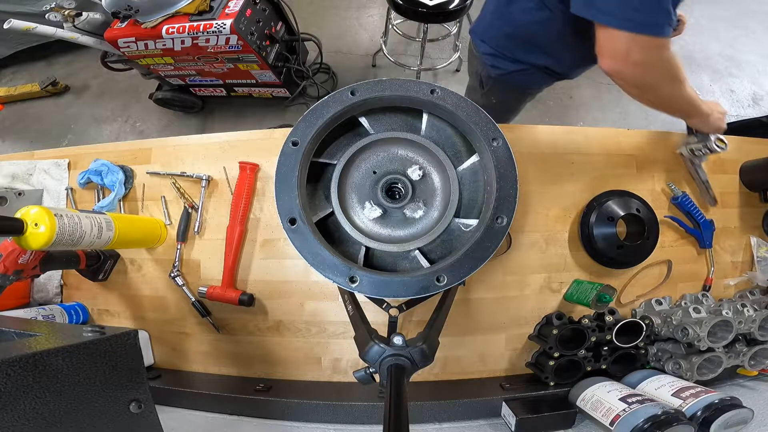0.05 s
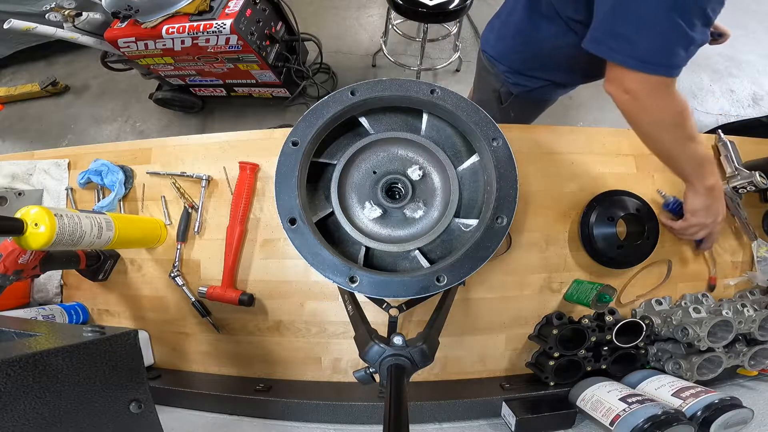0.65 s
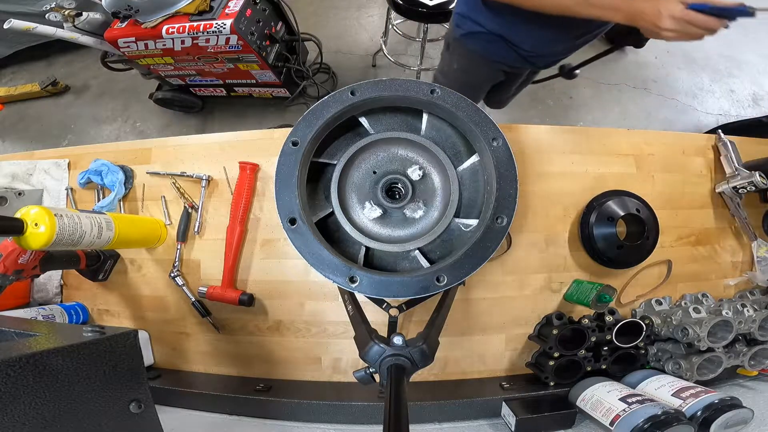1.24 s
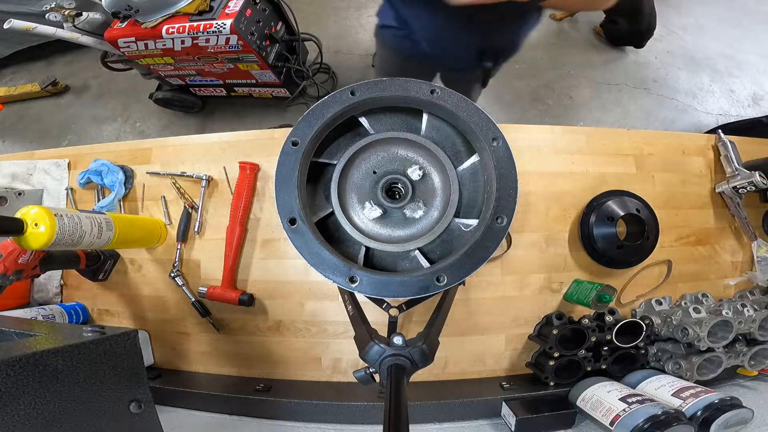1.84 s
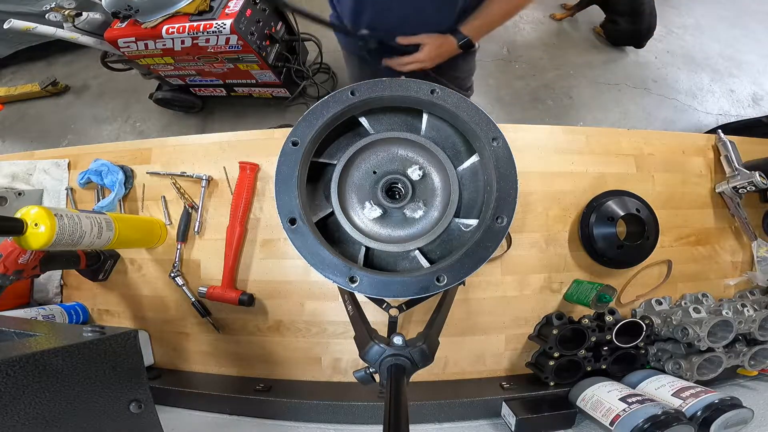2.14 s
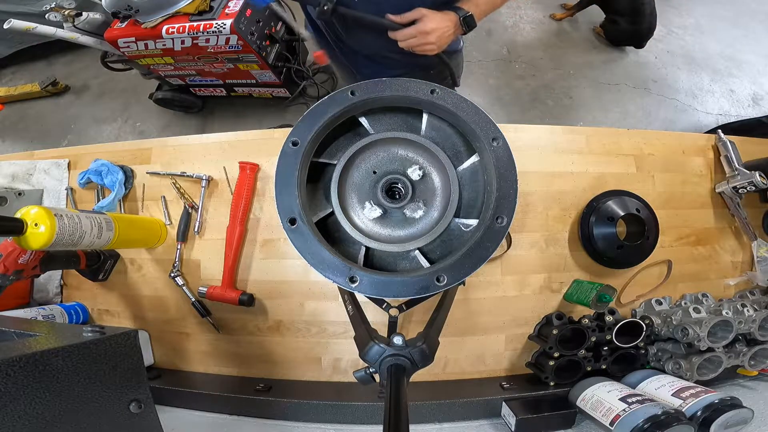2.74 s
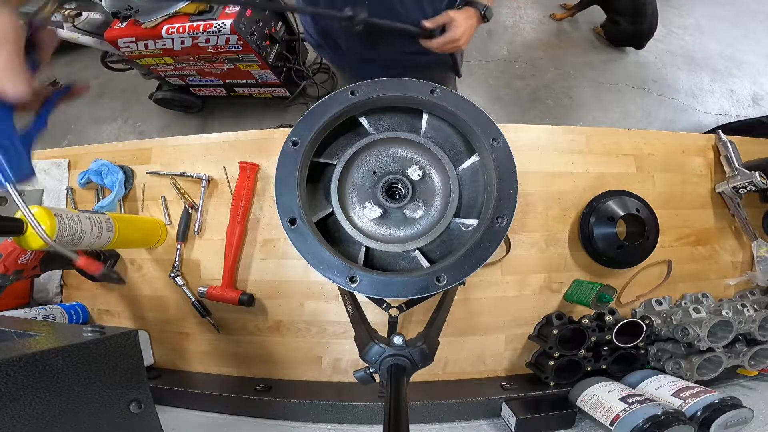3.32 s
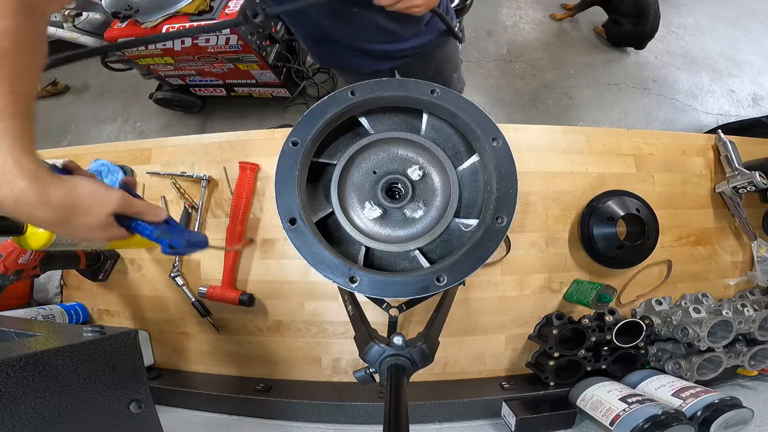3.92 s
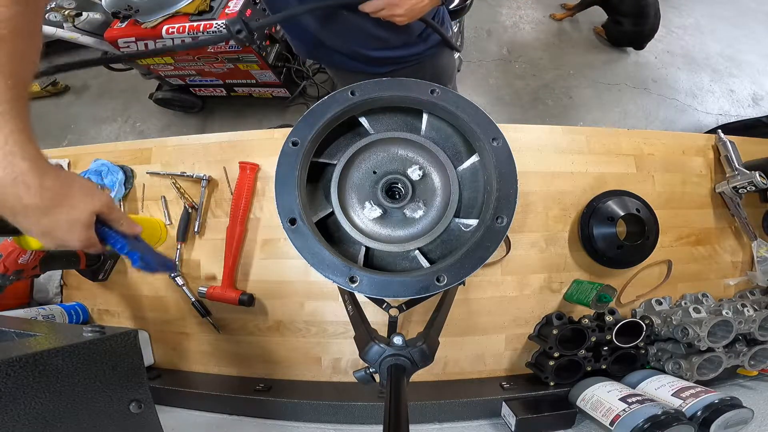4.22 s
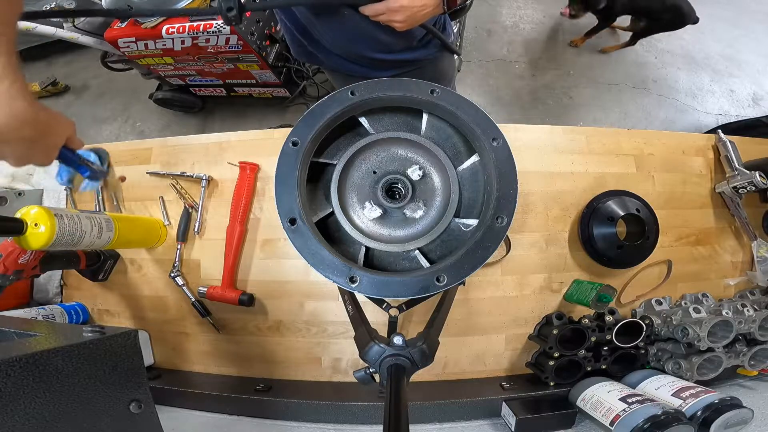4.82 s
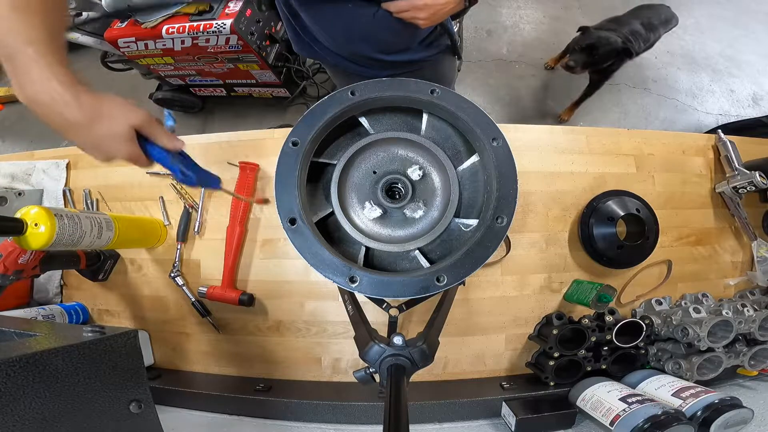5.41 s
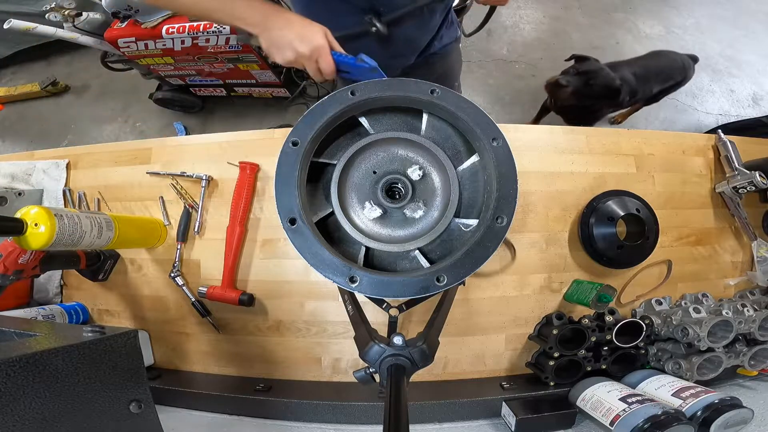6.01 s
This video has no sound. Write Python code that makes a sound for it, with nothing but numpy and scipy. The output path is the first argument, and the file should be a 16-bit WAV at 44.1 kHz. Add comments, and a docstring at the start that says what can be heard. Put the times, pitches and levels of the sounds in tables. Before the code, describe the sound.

Close to a wooden bench in a workshop, a metal tool clatters down over a faint machine drone. An air hose coupling clicks and snaps shut, spitting a little air. After a pause, a blow gun hisses briefly, stops, then blows for much longer. The jet flutters and splashes against the bench, changing in tone as it moves to the left and returns to the middle.

```python
"""A workshop, a stereo microphone close to a wooden bench; a machine drones behind throughout.
A steel tool is put down: the bench top rings and rattles, the steel chinks. A blow gun is picked up
and snapped onto its hose, spitting air as it seats. It gives a short blast, then a long one that
swings left and back: the jet hisses and splashes on the bench, and brief whistles, bands of hiss and
low rumbles swell and fade within it. After each loud sound the background sinks and creeps back."""
import sys
import numpy as np
from scipy import signal
from scipy.fft import rfft, irfft, next_fast_len
from scipy.io import wavfile
from scipy.ndimage import map_coordinates

SR = 44100
rng = np.random.default_rng(int(sys.argv[2]) if len(sys.argv) > 2 else 0)


def dump_mix(stems):
    """Bounce the given channels to the path in sys.argv[1] as a 16-bit WAV at rate SR."""
    frames = np.atleast_2d(stems).T  # one column per channel
    limited = np.clip(frames, -1, 1)  # hard clip at full scale
    pcm = np.round(limited * 32767).astype(np.int16)
    wavfile.write(sys.argv[1], SR, pcm)


N = 271656
TIME = np.arange(N) / SR
PADDED = next_fast_len(N + SR // 2, real=True)
FREQS = np.linspace(0, SR / 2, PADDED // 2 + 1)

# echo path between the nozzle and the nearest surface: (time [s], round trip [ms])
ROUND_TRIP = [(2.6, 0.99), (2.77, .78), (2.93, .45), (3.07, .8), (3.2, .6), (3.58, .53), (3.75, .74),
              (3.92, .5), (4.25, 0.909), (4.7, 1.0), (5.15, 1.0), (5.33, 1.4), (5.43, 0.762), (5.7, .52),
              (5.9, .75), (6.03, 1.08), (6.16, 1.3)]


def from_db(db):
    """Decibels to gain."""
    return 10 ** (np.asarray(db) / 20)


def rms_one(x):
    """Scale to unit power."""
    return x / np.sqrt(np.mean(x ** 2) + 1e-20)


def in_time(rows):
    """Each column of a curve at every sample."""
    times, *columns = np.transpose(rows)
    return [np.interp(TIME, times, column) for column in columns]


def over_freqs(points):
    """A spectrum table at every frequency."""
    hz, value = np.transpose(points)
    return np.interp(np.log(FREQS + 1), np.log(hz), value)


def shaped(x, gain):
    """Filter by a gain per frequency."""
    return irfft(rfft(x, PADDED) * gain, PADDED)[..., :N]


def noise(colour):
    """Unit noise of a given colour, falling away beyond its ends."""
    ends = 1 / (1 + (colour[0][0] / (FREQS + 1)) ** 4) / (1 + (FREQS / colour[-1][0]) ** 4)
    return rms_one(shaped(rng.standard_normal(N), from_db(over_freqs(colour)) * ends))


def drift(rate_hz):
    """A random wander of unit power."""
    knots = rng.standard_normal(4096)
    return rms_one(np.interp(TIME * rate_hz, np.arange(len(knots)), knots))


def band(x, low_hz, high_hz, order=2):
    """Causal band-pass."""
    high_hz = np.clip(high_hz, 40, .45 * SR)
    edges = [min(low_hz, high_hz - 5), high_hz]
    return signal.sosfilt(signal.butter(order, edges, "band", fs=SR, output="sos"), x)


def resonant_noise(hz, width_hz, size):
    """Unit noise in one band around hz."""
    white = rng.standard_normal(size + SR // 4)
    return rms_one(band(white, max(hz - width_hz / 2, 20), hz + width_hz / 2)[-size:])


def add(track, start, sound):
    """Mix a sound in at a time in seconds."""
    at = max(int(start * SR), 0)
    track[at:at + len(sound)] += sound[:N - at]


def dying(t, t60):
    """Exponential decay, 60 dB down after t60 seconds."""
    return np.exp(-np.log(1000) * t / t60)


def workshop():
    """The back of the shop: a machine's throbbing drone over dull noise and faint hiss."""
    # resonances of the machine: (frequency [Hz], width [Hz], level [dB])
    resonances = [(135.3, 9.2, 2), (338.4, 16, -5)]
    # colours of the room tone and its high hiss: (frequency [Hz], level [dB])
    room_colour = [(25, -21.5), (70, -14.5), (133, -3), (190, -17), (290, -17.5), (400, -19.5), (600, -24),
                   (1250, -22), (1900, -33), (3000, -47.5)]
    hiss_colour = [(2000, 10.5), (3200, 0.5), (5000, 1.5), (6200, -6.5), (7300, -8), (8300, -12),
                   (11000, -20.5), (12500, -21.5), (14000, -37)]
    drone = sum(from_db(db) * resonant_noise(hz, width_hz, N) for hz, width_hz, db in resonances)
    throb = rms_one(from_db(4.2 * drift(rate_hz=24)))
    room_tone = from_db(-48) * noise(room_colour) + from_db(-67) * noise(hiss_colour)
    return room_tone + from_db(-50.5) * throb * drone


def bench_knocks():
    """Each blow rings the top and rattles what lies on it; hard contacts are higher and die sooner."""
    # blows: (time [s], level [dB], centre of the contact's band [Hz], relative rattle [dB])
    knocks = [(.0643, -3, 1080, -15), (.072, -16.5, 790, -1), (0.103, -15, 940, -9), (.118, -28, 698, 7),
              (.2815, -5.5, 227, -6), (.317, -17.5, 330, 0.5), (.342, -22, 165, -2), (0.448, -12, 250, -2),
              (0.4771, -6.5, 970, -13.5), (.494, -12.5, 420, -1), (.519, -9, 360, -4.5),
              (.548, -22, 420, 4.5), (.58, -31.5, 377, 8.5), (0.65, -11.5, 1020, -16.5),
              (0.661, -18, 373, 1), (1.4221, -27.5, 1220, -6.5), (1.572, -38, 300, -0.5),
              (1.59, -30, 1050, -11), (1.688, -38, 230, -5), (2.138, -36, 900, -4.5)]
    # modes of the wooden top: (frequency [Hz], level [dB], t60 before the cap [s])
    wood_modes = [(119, 0.5, .14), (159, 5.5, 0.12), (222, -4, 0.088), (279.6, -4, 0.1),
                  (350.5, -2.5, 0.15), (408, -3.5, 0.03), (471, -15, 0.09), (600, -3, 0.053),
                  (787, -8, 0.05), (913, -4.5, 0.053), (1108, -9.5, 0.049), (1200, -11.5, 0.067),
                  (1560, -17, .055), (2487, -19.5, 0.04)]
    spread = 1.836   # a contact excites this ratio below and above its centre
    out, t = np.zeros(N), TIME[:SR // 2]
    for start, db, hz, rattle_db in knocks:
        low_hz, high_hz = hz / spread, hz * spread
        body = from_db(-7) * band(struck(wood_modes, t, vary_db=6, t60_cap=.14), low_hz, high_hz)
        rattle_t60 = 0.18 * (300 / hz) ** 0.61
        rattle = rms_one(band(rng.standard_normal(len(t)), low_hz, high_hz, order=3))
        rattle = rattle * dying(t, rattle_t60) * (1 - dying(t, 0.016))
        add(out, start, from_db(db) * (body + from_db(rattle_db) * rattle))
    return out


def struck(modes, t, vary_db, t60_cap):
    """Modes ring with new strengths on each blow."""
    out = np.zeros(len(t))
    for k, (hz, db, t60) in enumerate(modes):
        strength = (-1) ** k * from_db(db + vary_db * rng.standard_normal())
        out += strength * np.sin(2 * np.pi * hz * t) * dying(t, min(t60, t60_cap))
    return out


def clicks():
    """A broad crack and one damped ring for each small contact of tool, gun and hose coupling."""
    # contacts: (time [s], level [dB], ring frequency [Hz], relative ring level [dB], t60 [s])
    contacts = [(0.066, -43, 2400, 8, 0.041), (0.103, -42, 3120, -1, 0.053),
                (0.285, -48, 1760, 13.5, 0.035), (0.31, -50.5, 7100, -1.5, 0.21),
                (.347, -55.5, 3900, 19.5, 0.07), (.4775, -30, 1190, 9, 0.012), (.59, -64.5, 7360, 12, .24),
                (.651, -36.5, 2790, 9.5, 0.016), (.672, -51, 2860, 9.5, 0.036),
                (1.031, -55.5, 5860, 1, 0.11), (1.113, -72, 1920, 26.5, 0.21),
                (1.1365, -76, 2840, 30.5, 0.049), (1.366, -43.5, 2680, 19, 0.047),
                (1.392, -34, 1925, 9, 0.15), (1.419, -31, 2560, 13, 0.08), (1.4217, -21.5, 4300, 1, 0.055),
                (1.426, -25, 2860, 6, 0.054), (1.563, -35.5, 1880, -5, 0.24), (1.5899, -13, 2035, -5, 0.03),
                (1.788, -60, 6620, 1, 0.19), (2.137, -53, 1620, 14, 0.065),
                (2.1494, -53.5, 4340, 12, 0.063), (3.552, -42.5, 1960, -3.5, 0.12)]
    out, t = np.zeros(N), TIME[:SR // 4]
    for start, db, ring_hz, ring_db, t60 in contacts:
        crack = band(rng.standard_normal(len(t)), low_hz=1230, high_hz=ring_hz + 4500, order=1)
        crack = rms_one(band(crack, low_hz=900, high_hz=8520))
        ring = resonant_noise(ring_hz, width_hz=0.17 * ring_hz, size=len(t)) * (1 - dying(t, .003))
        add(out, start, from_db(db) * (crack + from_db(ring_db) * ring) * dying(t, t60))
    return out


def sinking(foreground, above_db=-35, share=0.97, recover_db_per_s=21, average_s=0.14):
    """Gain of the background: it sinks under loud lows and mids, then creeps back."""
    keep = np.exp(-1 / (average_s * SR))
    power = band(foreground, low_hz=60, high_hz=3000) ** 2 + 1e-12
    level_db = 10 * np.log10(signal.lfilter([1 - keep], [1, -keep], power))
    excess_db = np.maximum(level_db - above_db, 0)
    recovery_db = recover_db_per_s * TIME
    held_db = np.maximum.accumulate(excess_db + recovery_db) - recovery_db
    return from_db(-share * held_db)


def steel_chinks():
    """Short bright pings of the steel tool, roughened by its chatter as it touches."""
    # touches of the tool: (time [s], level [dB])
    touches = [(0.273, -39), (0.3134, -26), (.322, -26), (.334, -43), (.459, -41.5), (0.485, -43),
               (.503, -42), (.522, -41.5), (0.597, -26), (.603, -35.5), (0.627, -44)]
    # modes of the steel: (frequency [Hz], level [dB], width [Hz])
    steel_modes = [(5625, -2.5, 50), (7780, -21, 280), (10860, -7.5, 100), (11970, -24, 275),
                   (13000, -19, 150)]
    out, t = np.zeros(N), TIME[:SR // 6]
    envelope = dying(t, t60=0.067) * (1 - dying(t, 0.013))
    for start, db in touches:
        for hz, mode_db, width_hz in steel_modes:
            ping = from_db(1) * np.sin(2 * np.pi * (hz * t + rng.random()))
            chatter = from_db(-4) * resonant_noise(hz, width_hz, len(t))
            add(out, start, from_db(db + mode_db) * (ping + chatter) * envelope)
    return out


def coupling_leak():
    """Air spits from the hose coupling until it seals."""
    # spits of air: (time [s], length [s], level [dB])
    spits = [(1.379, 0.12, -41), (1.569, 0.083, -32.5)]
    # colour of the escaping air: (frequency [Hz], level [dB])
    leak_colour = [(300, -10), (900, 2), (2000, 7.5), (4500, 1), (7500, -7), (9000, -7), (12500, -19.5),
                   (15500, -23)]
    flow = sum(from_db(db) * airflow(start, start + length, attack_s=0.015, t60=0.2)
               for start, length, db in spits)
    return noise(leak_colour) * flow


def airflow(start, end, attack_s, t60):
    """Flow through an opening: it builds up, holds, and dies once shut."""
    return np.clip((TIME - start) / attack_s, 0, 1) ** 2 * dying(np.maximum(TIME - end, 0), t60)


def jet():
    """Fine eddies at the nozzle hiss; larger ones at obstacles flutter, the largest at blunt ones."""
    # pulls of the trigger: (pressed [s], released [s])
    pulls = [(2.568, 3.187), (3.535, 6.2)]
    # the nozzle turns to and from the microphone: (time [s], level [dB], relative sizzle [dB])
    short_aim = [(2.6, -21.5, -7), (2.67, -18.5, -10), (2.724, -38, -7.5), (2.822, -39.5, -7),
                 (2.86, -22.5, -15), (2.878, -30.5, -11), (2.936, -35.5, -13.5), (2.986, -24, -6),
                 (3.156, -18.5, -7.5), (3.178, -17.5, -11), (3.19, -21.5, -7.5)]
    long_aim = [(3.56, -27.5, -8), (3.66, -23.5, -5.5), (3.89, -18, -4.5), (3.98, -27, -7.5),
                (4.01, -19.5, -6), (4.2, -25.5, -1), (4.28, -27.5, -5.5), (4.46, -23, -6.5),
                (4.52, -31, -6), (4.67, -21.5, -11.5), (4.81, -30.5, -2.5), (5.03, -30, -7.5),
                (5.17, -40.5, -12), (5.25, -27, -5), (5.4, -26.5, -6.5), (5.49, -19, -5.5),
                (5.79, -22, -8.5), (5.83, -24, -9), (5.93, -25, -16), (5.96, -27.5, -10), (6.16, -20, -7.5)]
    # colours of the eddies, finest to largest: (frequency [Hz], level [dB])
    sizzle_colour = [(6500, -24.5), (8200, 2.5), (10000, 1), (11000, -2), (12000, 0.5), (13200, -7),
                     (14500, -18.5), (15600, -43)]
    hiss_colour = [(1500, -38), (2800, -10.5), (3700, -4.5), (5200, 0.5), (6500, 2), (7600, 2),
                   (8400, -7.5), (11000, -48)]
    splash_colour = [(1100, -50), (1500, -5.5), (1850, -3.5), (2500, -1), (3200, -5), (4000, -3.5),
                     (6000, -24)]
    roar_colour = [(500, -23.5), (750, -12), (1050, 1), (1450, 1.5), (1800, 1), (2800, -48.5)]
    buffet_colour = [(70, -1), (160, -7), (300, -11.5), (480, -3.5), (680, 4.5), (900, 0.5), (1500, -24.5)]
    aim_db, sizzle_db = in_time(np.vstack([short_aim, long_aim]))
    aim = from_db(aim_db)
    valve = sum(airflow(pressed, released, attack_s=0.031, t60=0.16) for pressed, released in pulls)
    # the share made in free air and the share made at obstacles add in power
    splash_gain = np.hypot(aim * from_db(-17.5), striking(graze_db=0))
    roar_gain = np.hypot(aim * from_db(-49.5), from_db(0.5) * striking(graze_db=-15.5))
    buffet_gain = np.hypot(aim * from_db(-32), from_db(-3.5) * striking(graze_db=-40.5))
    hiss = eddies(hiss_colour, flutter_db=1.0, flutter_hz=81)
    sizzle = from_db(sizzle_db) * eddies(sizzle_colour, flutter_db=1.27, flutter_hz=83)
    splash = splash_gain * eddies(splash_colour, flutter_db=1.1, flutter_hz=220)
    roar = roar_gain * eddies(roar_colour, flutter_db=2.5, flutter_hz=81)
    buffet = buffet_gain * eddies(buffet_colour, flutter_db=4.0, flutter_hz=69)
    nozzle = aim * from_db(1) * (hiss + sizzle)
    return valve * (reflected(nozzle) + trapped(splash + roar) + buffet)


def eddies(colour, flutter_db, flutter_hz):
    """Turbulent noise whose strength flutters."""
    return rms_one(noise(colour) * from_db(flutter_db * drift(flutter_hz)))


def striking(graze_db):
    """Strength of the eddies shed at obstacles: a swell for each, weaker where the jet only grazes."""
    # things in the jet's way: (middle time [s], length [s], level [dB], bluntness [0-1])
    obstacles = [(2.641, 0.098, -21.5, 0.87), (2.665, 0.087, -22.5, 0.8), (2.75, .17, -32, 0.64),
                 (2.864, 0.12, -31, .05), (3.062, .09, -23, 0), (3.148, 0.1, -27.5, 0.3),
                 (3.216, 0.11, -16, 0.4), (3.591, 0.051, -37.5, 0), (3.808, 0.46, -28, .12),
                 (4.071, 0.26, -26, .3), (4.189, 0.12, -21.5, 0.72), (4.254, 0.15, -20, .5),
                 (4.351, 0.13, -21.5, .7), (4.464, 0.16, -27.5, .5), (4.59, .09, -34, 0.5),
                 (4.681, 0.16, -22, 0.52), (4.771, 0.067, -28, 0.6), (4.838, 0.081, -30, 0.7),
                 (5.334, .06, -30.5, .95), (5.438, 0.067, -30.5, 0.98), (5.58, 0.32, -26, 0.2),
                 (5.788, 0.19, -29.5, 0), (5.903, 0.18, -24, 0.65), (5.99, 0.18, -27, 0.9),
                 (6.12, 0.46, -29, 0.5)]
    power = np.zeros(N)
    for middle, length, db, bluntness in obstacles:
        swell = signal.windows.hann(int(length * SR))
        add(power, middle - length / 2, swell * from_db(db + graze_db * (1 - bluntness)) ** 2)
    return np.sqrt(power)


def reflected(x, near_db=-24.5, far_db=-12):
    """A near and a far reflection sweep a comb through the hiss as the nozzle moves."""
    def delayed(ms):
        return map_coordinates(x, [np.arange(N) - ms * SR / 1000], order=2)

    near_ms = in_time(ROUND_TRIP)[0]
    far_ms = 3.0 + 0.13 * drift(rate_hz=2.6)
    near, far = from_db(near_db), from_db(far_db)
    return (x + near * delayed(near_ms) + far * delayed(far_ms)) / np.sqrt(1 + near ** 2 + far ** 2)


def trapped(x, echo_db=-11):
    """Splash bounces between nozzle and surface, so its pitch rises as the gap closes."""
    at = np.arange(N)
    trip_samples = in_time(ROUND_TRIP)[0] * SR / 1000
    gains = from_db(echo_db) ** np.arange(3)
    bounces = sum(gain * np.interp(at - k * trip_samples, at, x) for k, gain in enumerate(gains))
    return bounces / np.linalg.norm(gains)


def dappled(x, depth_db, patch_hz, rate_hz):
    """Scattering from the clutter makes narrow bands swell and fade as the nozzle moves."""
    hz, times, frames = signal.stft(x, SR, nperseg=512)
    grid = np.meshgrid(hz / patch_hz, times * rate_hz, indexing="ij")
    patches = map_coordinates(rng.standard_normal((256, 256)), grid, order=2, mode="mirror")
    return signal.istft(frames * rms_one(from_db(depth_db * patches)), SR)[1][:N]


def blast_swells():
    """Brief whistles, bands of hiss and low rumbles swell and fade within the blasts."""
    # bands of noise: (middle time [s], length [s], frequency [Hz], width [Hz], level [dB])
    noise_bands = [(2.624, .045, 510, 350, -22.5), (2.642, .052, 1206, 250, -26),
                   (2.672, .065, 2540, 600, -19.5), (3.075, .12, 2520, 200, -21),
                   (3.139, .067, 196, 190, -36), (3.577, .04, 1930, 270, -36.5),
                   (3.87, .077, 239, 152, -43.5), (4.17, .18, 7100, 900, -22.5),
                   (4.2, .03, 12700, 1000, -28.5), (4.213, .028, 140, 150, -35),
                   (4.312, .22, 1130, 218, -25), (4.69, 0.11, 950, 350, -29), (4.32, .15, 9410, 1800, -26),
                   (4.376, .052, 2100, 530, -20), (4.93, .1, 6100, 160, -33), (5.01, .28, 11100, 110, -39),
                   (5.24, .13, 5180, 300, -33), (5.146, 0.47, 7400, 1900, -32.5),
                   (5.0, .1, 2900, 200, -46.5), (5.264, .07, 2800, 250, -39.5), (5.25, .45, 130, 50, -43.5),
                   (5.166, .36, 500, 820, -51.5), (5.265, .1, 330, 120, -44), (5.791, .1, 400, 500, -38.5),
                   (5.337, .05, 780, 110, -31), (5.726, .11, 7460, 1400, -25.5),
                   (5.93, .13, 4260, 1300, -23.5), (6.023, .046, 930, 190, -29)]
    out = np.zeros(N)
    for middle, length, hz, width_hz, db in noise_bands:
        swell = signal.windows.tukey(int(length * SR), .6)
        add(out, middle - length / 2, from_db(db) * swell * resonant_noise(hz, width_hz, len(swell)))
    return out


def at_microphone(x, pan_db, frame_size, shadow_hz=3010, shadow_top_hz=11000):
    """Two ports: scattered sound makes them differ, and the housing shades the far one's treble."""
    # how alike the ports hear: (frequency [Hz], likeness [0-1])
    likeness = [(30, .6), (80, 1), (150, 1), (500, 0.92), (1000, 0.97), (2200, 0.8), (4500, 1),
                (8500, 0.89), (12000, 0.78), (15000, .5)]
    alike = np.clip(over_freqs(likeness), 0, 1)
    frames = signal.stft(x, nperseg=frame_size)[2]
    scattered = signal.istft(frames * np.exp(2j * np.pi * rng.random(frames.shape)))[1][:N]
    # the deepest bass is kept alike in both channels
    bass_cut = FREQS ** 2 / (FREQS ** 2 + (SR / frame_size) ** 2)
    side = shaped(np.std(x) * rms_one(scattered), bass_cut * np.sqrt((1 - alike) / (1 + alike)))
    shaded_band = FREQS ** 2 / (FREQS ** 2 + shadow_hz ** 2) / (1 + (FREQS / shadow_top_hz) ** 10)
    treble = shaped(x, shaded_band)
    return np.array([x + sign * side + treble * (from_db(sign * pan_db / 2) - 1) for sign in (1, -1)])


def room(x, t60=0.14):
    """A short diffuse tail from walls and floor, reaching the microphone 7 ms after the direct sound."""
    t = TIME[:SR // 2]
    diffuse = band(rng.standard_normal((2, len(t))), low_hz=120, high_hz=5000, order=1)
    tail = diffuse * dying(t, t60) * (t > .007)
    return signal.fftconvolve(x[None], tail / np.linalg.norm(tail[0]), axes=1)[:, :N]


def scene():
    """Tools close and near the middle, the jet swinging to the left and back, the shop behind."""
    # the jet's place before the microphone: (time [s], treble left over right [dB])
    jet_pan = [(2.55, 1.5), (2.9, 0), (3.15, 0.14), (3.7, 2.13), (4.3, 3.2), (4.8, 4.5), (5.3, 4.5),
               (5.65, 1), (6.16, 0.01)]
    tools = bench_knocks() + steel_chinks()
    gun = clicks() + coupling_leak()
    air = dappled(jet(), depth_db=2.5, patch_hz=200, rate_hz=14) + blast_swells()
    handling = at_microphone(tools + gun, pan_db=-.5, frame_size=128)
    blasts = at_microphone(air, pan_db=in_time(jet_pan)[0], frame_size=512)
    background = at_microphone(workshop(), pan_db=0, frame_size=4096) * sinking(tools + gun + air)
    reverb = room(from_db(-16) * tools + from_db(-10.5) * gun + from_db(-16) * air)
    return handling + blasts + background + reverb


def record(dry):
    """Peaks are rounded and the top is cut."""
    ceiling, cutoff_hz = .75, 15600
    limited = dry / (1 + (dry / ceiling) ** 6) ** (1 / 6)
    return signal.sosfilt(signal.ellip(10, .1, 80, cutoff_hz, fs=SR, output="sos"), limited)


dry = scene()
out = record(dry)
dump_mix(out)
```